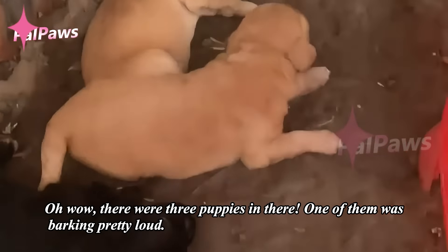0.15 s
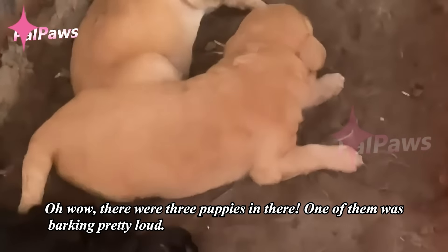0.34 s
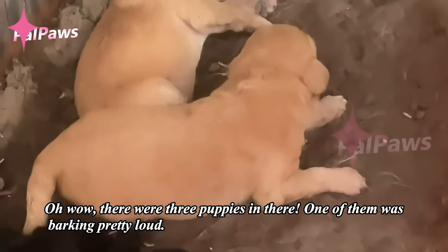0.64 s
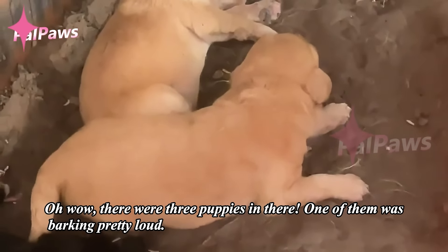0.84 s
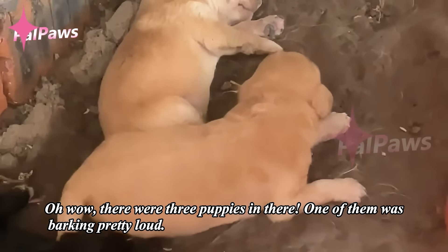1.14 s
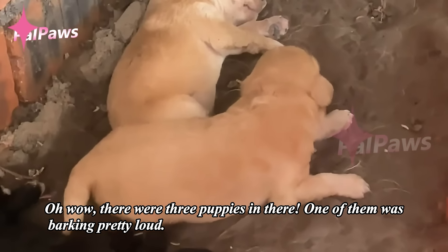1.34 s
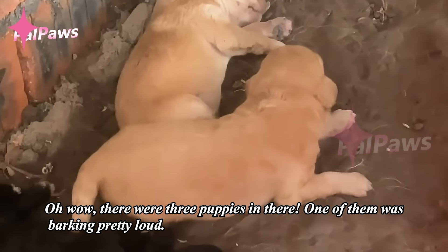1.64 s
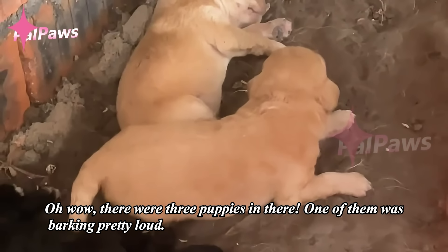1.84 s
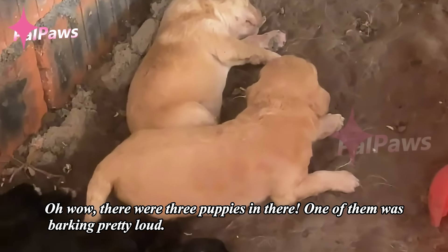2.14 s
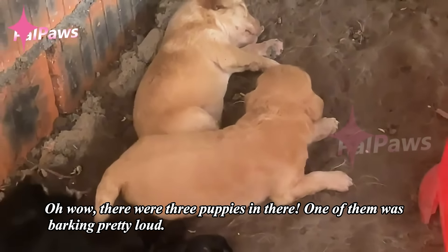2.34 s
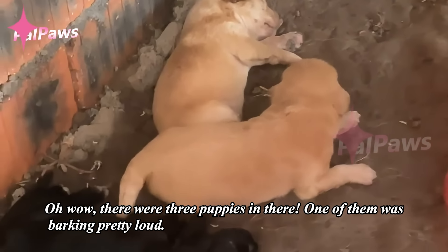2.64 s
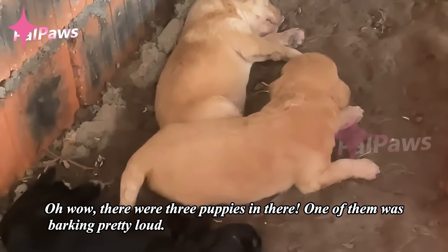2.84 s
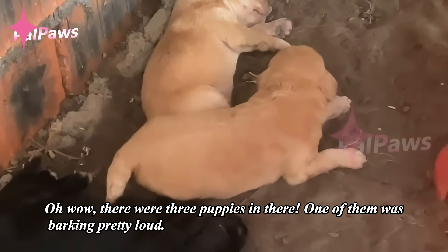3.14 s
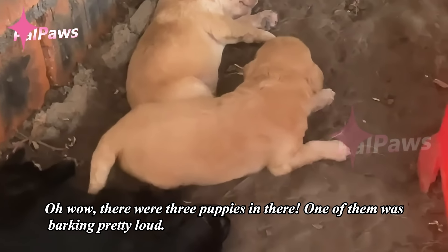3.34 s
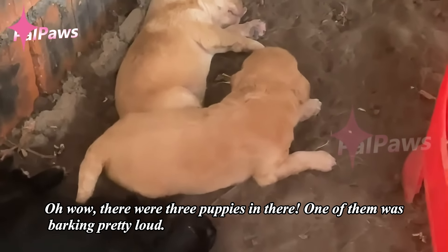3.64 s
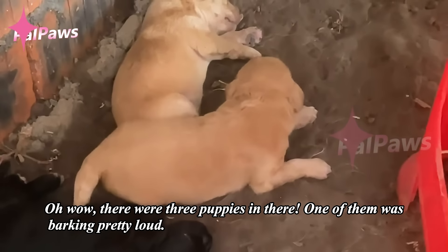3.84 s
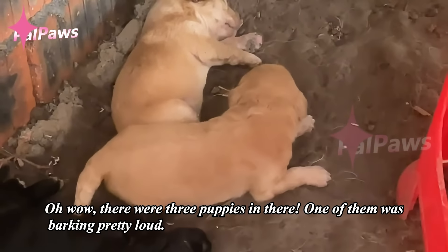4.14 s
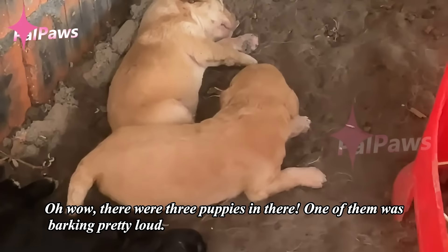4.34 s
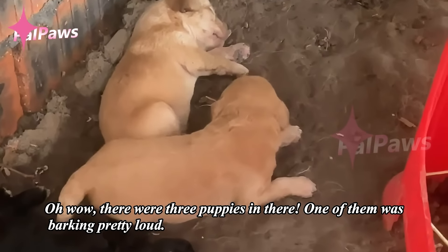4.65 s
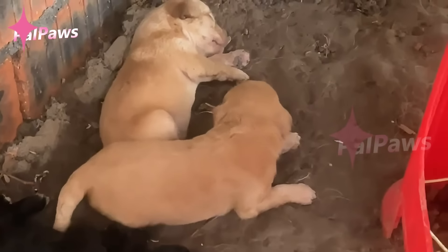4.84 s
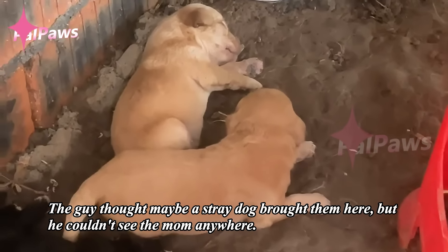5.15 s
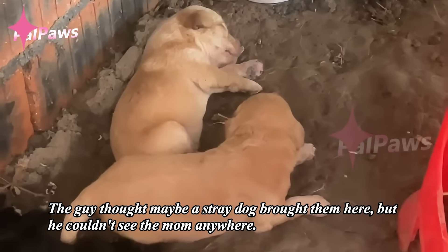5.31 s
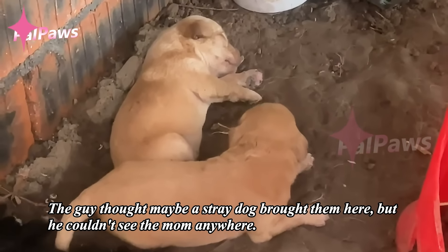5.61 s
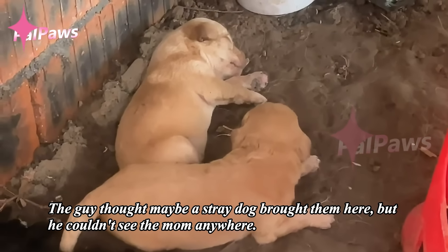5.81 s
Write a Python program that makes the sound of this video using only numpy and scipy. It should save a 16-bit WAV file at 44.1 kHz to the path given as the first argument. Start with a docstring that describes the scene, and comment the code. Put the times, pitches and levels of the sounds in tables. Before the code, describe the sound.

Loud, repeated yelps from a very young puppy outdoors, with soft ticking early on and another puppy's thin whines joining later.

```python
"""A newborn puppy whimpers, then yelps close to the microphone in a walled corner of a yard: each yelp
a fast rise, a long falling cry and a hoarse end, made by its vocal folds and shaped by its mouth.
From about 3 s a second puppy, farther off to the left, whines thin arches. Early on something ticks
in a steady row; the hand-held microphone is bumped, and far traffic rumbles under an insect-like hiss."""
import sys
import numpy as np
from scipy import signal
from scipy.fft import rfft, irfft
from scipy.io import wavfile
from scipy.ndimage import uniform_filter1d

SR = 44100
rng = np.random.default_rng(int(sys.argv[2]) if len(sys.argv) > 2 else 0)


def master_out(mix):
    """Clip the mix to full scale and print it as 16-bit PCM to the path in sys.argv[1]."""
    frames = np.transpose(np.atleast_2d(mix))
    ceiling = np.clip(frames, -1, 1)
    pcm = np.round(ceiling * 32767).astype(np.int16)
    wavfile.write(sys.argv[1], SR, pcm)


N = 263485
TIME = np.arange(N) / SR
CUTOFF_HZ = 15700


def amp(db):
    """Decibels to gain."""
    return 10 ** (np.asarray(db) / 20)


def rms_one(x):
    """Scale to rms 1."""
    return x / np.sqrt(np.mean(x ** 2) + 1e-20)


def at_hz(points, hz):
    """Read a spectrum on a log-frequency axis."""
    point_hz, values = np.transpose(points)
    return np.interp(np.log(hz), np.log(point_hz), values)


def filtered(x, kind, hz, order=2):
    """Butterworth filter."""
    return signal.sosfilt(signal.butter(order, hz, kind, fs=SR, output="sos"), x)


def drift(rate_hz):
    """Smooth random wander, rms 1."""
    pole = np.exp(-2 * np.pi * rate_hz / SR)
    wander = signal.lfilter([1], [1, -2 * pole, pole * pole], rng.standard_normal(N + 20000))
    return rms_one(wander[20000:])


def coloured(spectrum):
    """Steady noise of the given colour, rms 1."""
    hz = np.maximum(np.fft.rfftfreq(N + 1, 1 / SR), 5)
    outside = (hz < spectrum[0][0]) | (hz > spectrum[-1][0])
    gain = amp(at_hz(spectrum, hz) - 33 * outside)
    return rms_one(irfft(rfft(rng.standard_normal(N + 1)) * gain, N + 1)[:N])


# Far traffic below, insect-like hiss above: (frequency [Hz], relative level [dB])
YARD_COLOUR = [(25, -36.5), (50, 0.5), (100, -0.5), (170, -11.5), (300, -13.5), (600, -25.5), (1200, -31),
               (2900, -31.5), (3300, -23), (4500, -18), (4750, -29.5), (4900, -49.5), (5080, -18),
               (7600, -26), (8600, -48), (15500, -69)]
# Extra colour of the stereo side signal: (frequency [Hz], relative gain [dB])
SIDE_COLOUR = [(25, 0), (200, -2), (1400, 7), (3000, 2), (5000, 4), (15000, 7)]
# The rumble swells and sinks: (time [s], gain [dB])
RUMBLE_SWELL = [(0, -1), (.7, -5.5), (1.3, -3), (2, -1), (2.6, 0), (3.2, -3.5), (3.8, 0.5), (4.4, 1),
                (5, -6), (6, 1)]


def traffic_and_hiss(voices, level_db=-59.5, side_db=-12, gust_db=3.5, dip_per_db=0.26, quiet_db=-45):
    """Distant rumble comes in gusts; all above the bass dips under loud cries."""
    side_colour = [(hz, db + at_hz(SIDE_COLOUR, hz)) for hz, db in YARD_COLOUR]
    air = coloured(YARD_COLOUR) + amp(side_db) * coloured(side_colour) * [[1], [-1]]
    cry_db = 10 * np.log10(np.maximum(uniform_filter1d(voices ** 2, size=4000), 1e-9))
    hiss_db = 1.2 * drift(3) - dip_per_db * np.maximum(cry_db - quiet_db, 0)
    rumble_db = gust_db * drift(6) + np.interp(TIME, *np.transpose(RUMBLE_SWELL))
    rumble = amp(rumble_db) * filtered(air, "low", 160)
    hiss = amp(hiss_db) * filtered(air, "high", 160)
    return amp(level_db) * (rumble - hiss)


# Faint tone in the centre: (time [s], pitch [Hz], level [dB])
HUM_FADE = [(0, 461, -63.5), (0.698, 477, -76.5), (1.199, 461, -93), (1.999, 480, -100)]


def hum(waver_db=3.0):
    """A wavering sine fades away over the first second."""
    times, hz, level_db = np.transpose(HUM_FADE)
    phase = 2 * np.pi * np.cumsum(np.interp(TIME, times, hz)) / SR
    return amp(np.interp(TIME, times, level_db) + waver_db * drift(15)) * np.sin(phase)


def walls(sound, side_db, level_db=-12, t60_s=0.089, gap_s=0.006):
    """Brickwork near the microphone returns short dense echoes: decaying noise after a first gap."""
    age = np.arange(round(0.3 * SR)) / SR
    mid, side = rng.standard_normal((2, len(age))) * amp(-60 * age / t60_s) * (age > gap_s)
    # left and right differ least in the upper midrange
    side = 0.3 * side + 2.0 * filtered(side, "bandstop", [1900, 3700], 3) + 1.2 * filtered(side, "high", 5000)
    echoes = mid + amp(side_db) * side * [[1], [-1]]
    gain = amp(level_db) / np.sqrt(np.sum(mid ** 2))
    return gain * signal.fftconvolve(sound[None], echoes, axes=1)[:, :N]


# Ticks in the centre, most about an eighth of a second apart: (time [s], level [dB])
TICK_ROW = [(0.133, -49), (0.8724, -52.5), (1.0776, -27.5), (1.1953, -21), (1.3013, -20.5), (1.4073, -26),
            (1.5236, -25), (1.649, -24), (1.7728, -22.5), (1.9011, -25.5), (2.0268, -25.5), (2.1555, -27.5),
            (2.285, -25), (2.4253, -27)]
# Colour of a tick: (frequency [Hz], relative level [dB])
TICK_COLOUR = [(120, -48.5), (200, -9.5), (1130, -11), (1380, -14), (1850, -5), (2550, -4.5), (3290, -2.5),
               (4010, -13.5), (4900, -15.5), (5700, -12), (6800, -22), (8570, -44), (15000, -45)]


def ticks(rise_s=0.0046, t60_s=0.039, lead_s=0.003, crest_db=6):
    """Each tick is a short dry burst of noise."""
    envelope = np.zeros(N)
    for time_s, level_db in TICK_ROW:
        age = np.maximum(TIME - time_s + lead_s, 0)
        envelope += amp(level_db - crest_db - 60 * age / t60_s) * np.minimum(age / rise_s, 1)
    return envelope * coloured(TICK_COLOUR)


# Handling of the microphone: (time [s], level [dB], time to fall 60 dB [s])
CASE_KNOCKS = [(0.148, -47.5, 0.19), (0.568, -49.5, 0.049), (1.097, -40.5, 0.031), (1.862, -47.5, 0.056),
               (1.898, -42.5, 0.088), (1.946, -45.5, 0.024), (2.011, -30.5, 0.13), (2.045, -51, 0.019),
               (2.078, -30.5, 0.02), (2.339, -18.5, 0.0043), (2.345, -36, 0.047), (3.785, -46, 0.12),
               (4.967, -41.5, 0.014)]


def microphone_bumps(fall_s=0.00383, drop_hz=400, end_hz=100, snap_db=-14):
    """A knock on the case: a tone that drops fast to the bass, with a dull snap on top."""
    out, age = np.zeros(N), np.arange(round(0.12 * SR)) / SR
    snaps = rms_one(filtered(rng.standard_normal((len(CASE_KNOCKS), len(age))), "low", 900))
    hz = end_hz + drop_hz * np.exp(-age / fall_s)
    thud = np.sin(2 * np.pi * np.cumsum(hz) / SR)
    for (time_s, level_db, t60_s), snap in zip(CASE_KNOCKS, snaps):
        start, decay = round(time_s * SR), amp(-60 * age / t60_s)
        out[start:start + len(age)] += amp(level_db) * decay * (thud + amp(snap_db) * decay * snap)
    return out


def call(rows, fade_s=0.0017, glide_s=0.0093):
    """Sample slice, column curves (muscles round every corner) and soft on-off gate of one call."""
    times, *columns = np.transpose(rows)
    span = slice(max(round(times[0] * SR), 0), min(round(times[-1] * SR), N))
    t = TIME[span]
    gate = np.clip(np.minimum(t - times[0], times[-1] - t) / fade_s, 0, 1)
    curves = [np.interp(t, times, column) for column in columns]
    return span, uniform_filter1d(curves, round(glide_s * SR), axis=1, mode="nearest"), gate


# Far puppy, per whine: (breath against tone [dB], rows of (time [s], pitch [Hz], level [dB]))
FAR_WHINES = [ (-28, [(3.2, 1166, -79.5), (3.25, 1240, -43), (3.29, 1510, -23), (3.32, 1636, -39),
              (3.416, 1397, -33), (3.45, 1540, -32), (3.49, 1800, -60.5), (3.52, 1780, -44)]),
              (-6, [(3.76, 1510, -50), (3.79, 1640, -46.5), (3.82, 1627, -53), (3.833, 1600, -45),
              (3.845, 1598, -46.5), (3.87, 1416, -52.5), (3.9, 1290, -62), (3.94, 1280, -78)]),
              (-27, [(4.025, 1045, -43), (4.057, 1257, -23.5), (4.119, 1678, -26.5), (4.149, 1705, -33.5),
              (4.193, 1524, -30.5), (4.223, 1335, -51), (4.25, 1180, -60)]), (-28, [(4.36, 1093, -48.5),
              (4.414, 1272, -23.5), (4.462, 1545, -20.5), (4.472, 1682, -25), (4.51, 1705, -26),
              (4.562, 1455, -38), (4.624, 1118, -63), (4.65, 1200, -83)]), (-26, [(4.715, 1274, -43.5),
              (4.749, 1613, -26.5), (4.789, 1685, -26), (4.811, 1614, -32.5), (4.841, 1463, -33.5),
              (4.893, 1213, -40.5), (4.93, 1120, -72)]), ]
# Colour of its breath: (frequency [Hz], relative level [dB])
NOSE_BREATH = [(250, -1.5), (700, -17.5), (1500, -1), (2200, -13), (3500, -27), (8000, -41.5)]


def far_puppy(shimmer_db=2.0):
    """A nasal whine some way off, close to a sine, with some breath."""
    out, shimmer, air = np.zeros(N), drift(27), coloured(NOSE_BREATH)
    for breath_db, rows in FAR_WHINES:
        span, (hz, level_db), gate = call(rows, fade_s=0.017)
        phase = 2 * np.pi * np.cumsum(hz) / SR
        tone = np.sqrt(2) * amp(shimmer_db * shimmer[span]) * np.sin(phase)
        out[span] += gate * amp(level_db) * (tone + amp(breath_db) * air[span])
    return out


# The near voice cracks, mostly as a yelp ends:
# (centre time [s], length [s], flutter rate [Hz], depth [0-1], breath gain [dB])
VOICE_CRACKS = [(0.063, 0.08, 322, 0.47, -23), (0.406, 0.1, 263, 0.14, 8.5), (0.79, 0.051, 270, 0.38, -10),
                (2.27, 0.038, 362, 0.92, 9), (2.942, 0.09, 160.1, 0.2, 22),
                (3.745, 0.029, 352.6, 0.66, 17.5), (4.117, 0.038, 308, 0, 16.5),
                (4.45, 0.079, 326.6, .55, 23.5), (5.153, 0.023, 246.2, 0.2, -1),
                (5.499, 0.036, 292, 0.15, 5), (5.893, 0.025, 350, 0.75, 15)]


def rasps(yelps, onset_s=0.064, onset_hz=312.3, onset_depth=0.16, uneven=0.25):
    """Gain that beats unevenly in each rasp and is 1 elsewhere, and the breath let through in dB."""
    uneven_time = np.cumsum(1 + uneven * drift(90)) / SR
    beats, leak_db = np.ones(N), np.zeros(N)
    # every call after the first also starts rough
    onsets = [(rows[0][0] + onset_s / 2, onset_s, onset_hz, onset_depth, 0) for rows in yelps[1:]]
    for centre_s, length_s, hz, depth, breath_db in VOICE_CRACKS + onsets:
        window = np.exp(-(2 * (TIME - centre_s) / length_s) ** 4)
        beats += depth * window * np.sin(2 * np.pi * hz * uneven_time)
        leak_db += breath_db * window
    return beats, leak_db


# Colour of the near yelps as heard, with a narrow dip near 4.9 kHz: (frequency [Hz], gain [dB])
YELP_COLOUR = [(450, 11), (700, -6.5), (900, -11.5), (1050, 3.5), (1180, -1.5), (1290, -13.5), (1420, -7),
               (1600, -1.5), (1800, -12), (2000, -6.5), (2250, -1.9), (2480, -4.5), (2750, 1.5), (2950, -2),
               (3200, -2.5), (3500, -7), (3800, -11), (4300, -12), (4650, -4.5), (4900, -28.5),
               (5200, -19.5), (6000, -24), (7200, -21.5), (8000, -35), (8900, -58.5), (10500, -36.5),
               (12500, -58.5), (14500, -46)]
# Where the mouth opening acts: (frequency [Hz], share [ratio])
MOUTH_SHARE = [(450, -0.015), (1000, -0.078), (1400, -0.2), (2000, 0.16), (2400, 0.66), (2800, 0.81),
               (3300, .99), (4000, 0.25), (5500, 0.093), (8000, 0.14)]
# Where brightness acts, treble against middle: (frequency [Hz], share [ratio])
BRIGHT_SHARE = [(450, 0.39), (1000, -0.074), (1400, -0.27), (2000, -0.63), (2400, -0.86), (2800, -0.071),
                (3300, -0.12), (4000, 1.0), (5500, 0.35), (8000, 0.22)]


def yelp_timbre(hz, mouth_db, bright_db):
    """Gain of a partial in dB: a steady colour, varied by mouth opening and brightness."""
    opening_db = mouth_db * at_hz(MOUTH_SHARE, hz)
    return at_hz(YELP_COLOUR, hz) + opening_db + bright_db * at_hz(BRIGHT_SHARE, hz)


# Near puppy, per yelp: rows of (time [s], pitch [Hz], effort [dB], mouth opening [dB], brightness [dB])
NEAR_YELPS = [
    [(0.0, 723, -48, -18, -12), (0.02, 670, -48, -20, -13), (0.048, 567, -55.5, -9.5, -17.5),
     (0.085, 595, -73.8, -10, 6.3)],
    [(0.291, 622, -49, -9, -19.5), (0.305, 778, -45, 7, -14), (0.323, 981, -36, 6.5, -33.5),
     (0.335, 1142, -35.5, 12.5, -6.5), (0.347, 1410, -30, -4, 4), (0.36, 1451, -24, -4, -12),
     (0.39, 1424, -33, -7.5, -14), (0.42, 1397, -38, -21, -24), (0.458, 1383, -36.5, -31.5, -15.5),
     (0.512, 1252, -36, -25, -23.5), (0.525, 1147, -43, -6.5, -16.5), (0.54, 1032, -39, -28.5, -18.5),
     (0.598, 920, -37.5, -13.5, -22.5), (0.652, 781, -46, -12.5, -17.5), (0.7, 739, -43.5, -28, -14.2),
     (0.74, 671, -47, -11, -9), (0.778, 553.5, -54.5, -28, -20), (0.82, 668, -61.5, -22.2, 12)],
    [(1.2, 436, -62, 10, -10), (1.232, 778, -44, 13.5, -17.5), (1.264, 1002, -38.5, 4.5, -22.5),
     (1.285, 1056, -39.5, 14.5, -19), (1.308, 1151, -39.5, 3, -22.5), (1.335, 1183, -43, 16.5, -18),
     (1.37, 1131, -43.0, 2.5, -16), (1.48, 1073, -45.5, 7.9, -11), (1.552, 1014, -43, -7.5, -17.5),
     (1.598, 1032, -41.5, -18, -8.5), (1.708, 968, -40, -8, -8), (1.814, 911.5, -41, -15.5, -25.5),
     (1.926, 946, -39.5, -18.5, -27.5), (2.038, 876.4, -39.5, -15, -15.5), (2.1, 828, -46, -8.5, -9.5),
     (2.162, 776.4, -50, -8.5, -17), (2.206, 829, -51.2, -9.5, -13.5), (2.248, 706, -49, -12.8, -10.4),
     (2.285, 732, -60.5, -21, 13)],
    [(2.525, 595, -49.5, -1.5, -12.5), (2.541, 783, -44, 13, -12.5), (2.555, 936, -38, 9, -9),
     (2.567, 1154, -38.5, 22.5, -13.5), (2.592, 1421, -31.5, 2.4, 7), (2.622, 1354, -30.5, 2, -17.5),
     (2.654, 1288, -39, -1, -18.5), (2.686, 1112, -39.5, -15, -14), (2.7, 1018, -42, -11, -17),
     (2.718, 900, -45, -2.5, -16.5), (2.772, 711, -46, -14, -12.5), (2.84, 662, -50.5, -13.5, -6),
     (2.87, 592.6, -52, 0.3, -15.5), (2.9, 525, -57, 8.5, -4.5), (2.99, 629.4, -64, -15.5, 7)],
    [(3.225, 578, -57.5, 4.5, -14), (3.259, 822, -37.5, 10, -2.5), (3.283, 1137, -32, 12, -2.5),
     (3.3, 1197, -36.5, 16.5, -9), (3.319, 1363, -34.5, 15, 10.5), (3.34, 1340, -32, 13.5, -19.5),
     (3.372, 1253, -39, 2.5, -7.5), (3.4, 1139, -42.5, 9, -17), (3.43, 1024, -44.5, 18, -4.5),
     (3.47, 966, -43.5, 13.5, -10.5), (3.518, 926.7, -44, 11, -8), (3.62, 903.4, -45, 12, -15),
     (3.662, 882, -46.5, 7.5, -13.5), (3.7, 839, -48.5, 17.5, 1), (3.73, 754, -51, 17, -8),
     (3.78, 905, -47.5, -25, -2)],
    [(3.998, 596, -52, 2.5, -5), (4.014, 778, -43.5, 17.5, -10), (4.028, 956, -35.5, 10.5, 0.5),
     (4.042, 1161, -36.5, 19.5, -10.5), (4.056, 1278, -33, 15, 9.5), (4.07, 1478, -32.5, 10.5, -0.5),
     (4.1, 1418, -35, 6.5, -9), (4.132, 1384, -38, 3.5, -21), (4.168, 1304, -40, 5.5, -23.5),
     (4.216, 1123, -42, -22.5, -13.5), (4.25, 1094, -42.5, -1, -8), (4.29, 983, -46.5, 10.5, -15),
     (4.32, 1021, -44, 11.5, -12.8), (4.344, 930, -50.5, 14.5, -14.5), (4.37, 851, -48, 12.5, -13),
     (4.402, 718, -55.5, 20, -9.5), (4.458, 771, -61.5, 2.5, -4.5), (4.48, 760, -74, 2, 1.5)],
    [(4.695, 577, -53, -1, -11), (4.713, 790, -47.5, 16, -13), (4.727, 884, -40.5, 13.5, 3.5),
     (4.741, 1065, -34.5, 12, -5.5), (4.77, 1252, -33.5, 14.5, 0.5), (4.8, 1339, -46.5, 38.5, 6.5),
     (4.842, 1241, -39.5, 9, -9.5), (4.88, 1055, -43, 15, -4.5), (4.91, 1029, -44.5, 16, -7.7),
     (4.94, 985, -44.5, 14, -8), (5.022, 1002, -41, 12.5, -5), (5.116, 1024, -47, 11, -10),
     (5.148, 814, -44.5, 16, 5.5), (5.178, 1004, -46.5, -17, -14), (5.19, 889, -68.3, 3, -4)],
    [(5.39, 558, -58.5, 1, -2), (5.408, 756, -47, 16, -11), (5.42, 909, -40.5, 15.5, -1.5),
     (5.432, 1055, -38, 11.5, -11), (5.445, 1175, -36, 20.5, -1.5), (5.46, 1432, -30, 3, 5),
     (5.495, 1357, -34.5, 5.5, -14.4), (5.534, 1335, -32, -3, -32.5), (5.565, 1232, -41, 8.5, -17.3),
     (5.598, 1153, -38.5, -7, -13.5), (5.64, 1057, -43, 7.5, -12.5), (5.694, 955, -43.5, 16, -15),
     (5.77, 916, -45, 9, -10.5), (5.804, 916, -43.5, 8, -11.5), (5.85, 842, -48.5, 20.5, 2.5),
     (5.89, 773, -54.5, 17.5, -8), (5.93, 847, -69, -2.5, -3.6)],
]
# How piercing each yelp is: (gain above the fourth partial [dB])
YELP_PIERCE = [-1, -7.5, -3, -0.5, -3, -2.5, -2.5, -2.5]
# Breath in the open mouth: (frequency [Hz], relative level [dB])
MOUTH_BREATH = [(250, -29.5), (500, 2.5), (1200, -13), (2300, 4), (3200, 5.5), (4200, -31), (5000, -22.5),
                (7000, -28), (8600, -52), (15000, -54)]
# Bright hiss of a strained throat: (frequency [Hz], relative level [dB])
STRAIN_HISS = [(3500, -1), (4600, 2), (5000, -18), (6300, -3.5), (7800, -9), (8900, -44.5), (10500, -14.5),
               (12600, -36.5), (14500, -9), (15600, -21.5)]


def near_puppy(jitter=0.0034, rasp_jitter=0.11, breath_db=-64.5, breath_follows=0.21, strain_db=-31):
    """Close up, vocal folds give a stack of wavering partials; breath noise puffs once a cycle."""
    out, waver, air = np.zeros(N), drift(24), coloured(MOUTH_BREATH)
    shimmer = [drift(31) for _ in range(3)]
    beats, leak_db = rasps(NEAR_YELPS)
    strain = coloured(STRAIN_HISS)
    waver = jitter * waver + rasp_jitter * (beats - 1) * drift(92)   # a rasp also shakes the pitch
    for rows, pierce_db in zip(NEAR_YELPS, YELP_PIERCE):
        span, (hz, effort_db, mouth_db, bright_db), gate = call(rows)
        phase = 2 * np.pi * np.cumsum(hz * (1 + waver[span])) / SR
        partials_db = [effort_db + yelp_timbre(k * hz, mouth_db, bright_db) for k in range(1, 17)]
        air_db = breath_db + breath_follows * (effort_db + 36) + leak_db[span]
        voice = amp(air_db) * air[span] * (1 + 0.15 * np.cos(phase))
        # the throat strains most as the pitch climbs
        climb = np.clip(np.gradient(np.log(hz)) * SR / 2.8, 0.071, 1)
        voice += amp(np.max(partials_db, axis=0) + strain_db) * climb * strain[span]
        for k, level_db in enumerate(partials_db, start=1):
            shimmer_db = 1.25 if k <= 4 else 3.5   # weak partials come and go
            gain = amp(level_db + pierce_db * (k > 4) + shimmer_db * shimmer[k % 3][span])
            voice += np.sqrt(2) * gain * (k * hz < CUTOFF_HZ) * np.sin(k * phase + k * k)
        out[span] += gate * voice
    return out * beats


def scene(lag_samples=2):
    """The near puppy is straight ahead; the far one reaches the left channel first."""
    near, far = near_puppy(), far_puppy()
    knocks = ticks() + microphone_bumps()
    far_pair = np.array([amp(0.7) * np.roll(far, -lag_samples), amp(0.9) * np.roll(far, lag_samples)])
    echoes = walls(near + knocks, side_db=-10) + walls(far, side_db=0)
    return traffic_and_hiss(near + far) + hum() + echoes + knocks + far_pair + near


def record(dry):
    """A steep low-pass cuts the top of the treble."""
    return signal.sosfilt(signal.cheby2(12, 70, CUTOFF_HZ, fs=SR, output="sos"), dry)


dry = scene()
out = record(dry)
master_out(out)
```